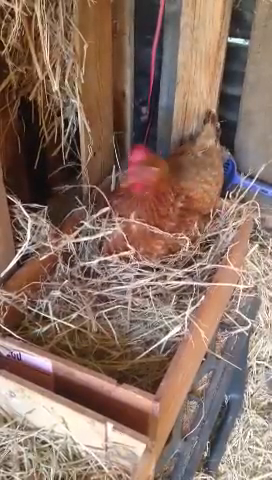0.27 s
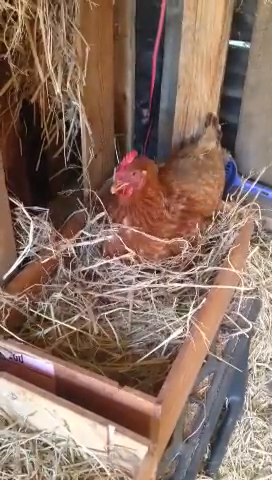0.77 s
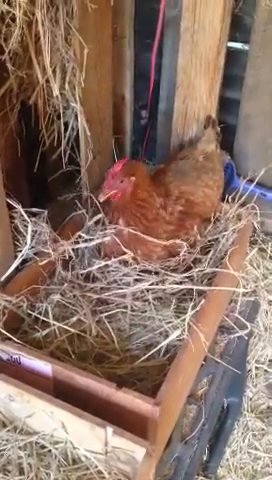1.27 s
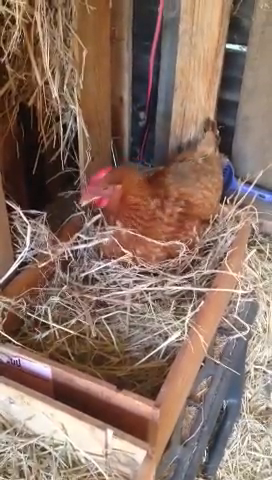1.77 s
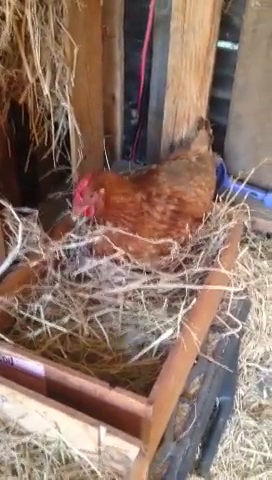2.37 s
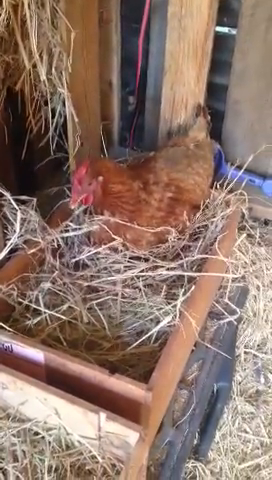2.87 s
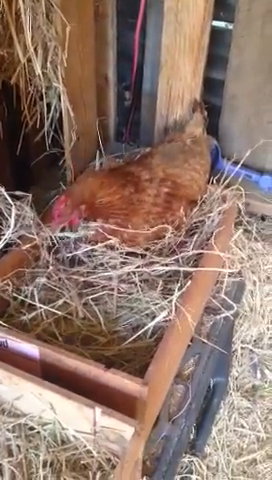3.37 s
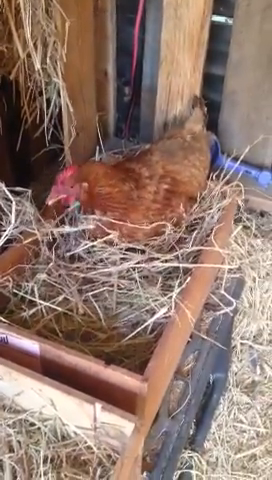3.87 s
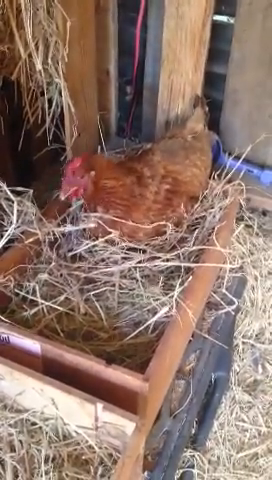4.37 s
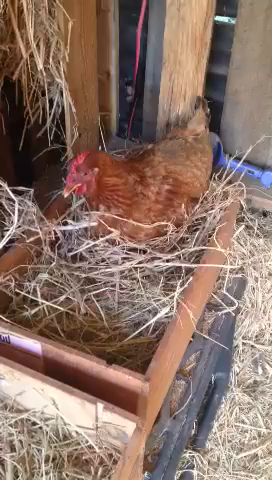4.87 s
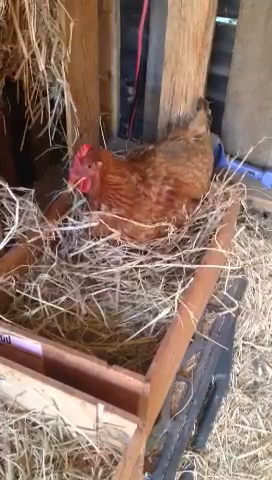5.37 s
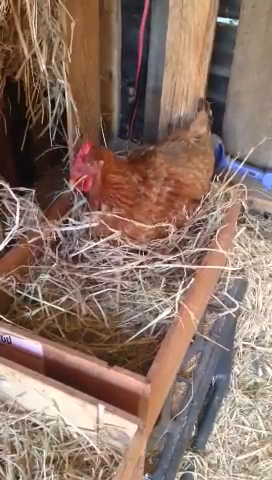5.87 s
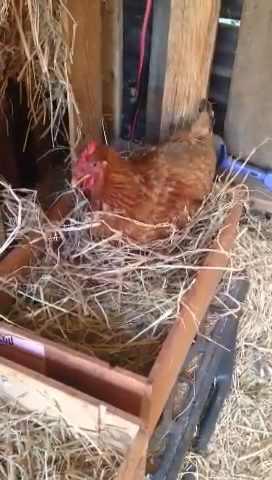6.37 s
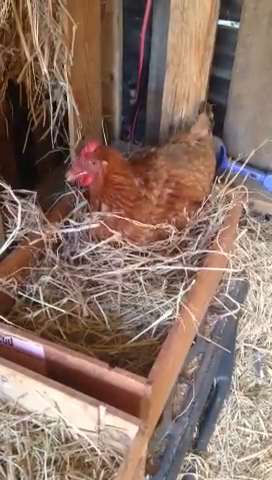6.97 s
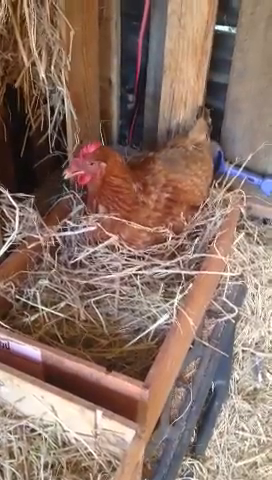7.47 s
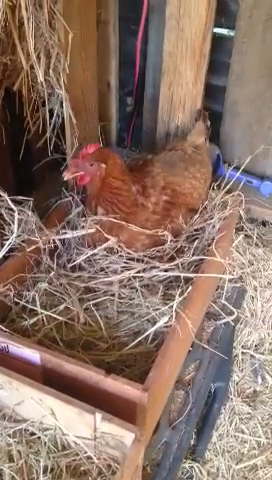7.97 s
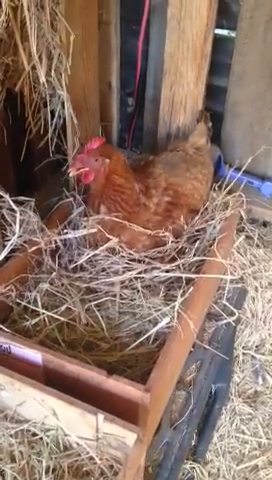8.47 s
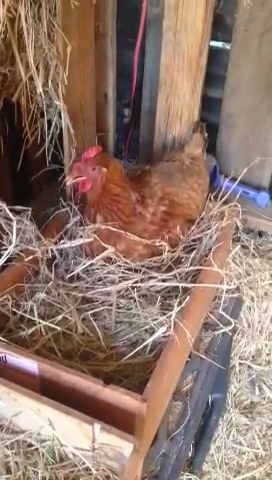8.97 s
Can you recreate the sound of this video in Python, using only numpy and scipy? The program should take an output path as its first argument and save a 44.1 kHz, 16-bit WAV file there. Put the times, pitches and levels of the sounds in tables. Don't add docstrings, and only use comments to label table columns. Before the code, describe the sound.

A hen in a straw-lined wooden nest box, an arm's length from a phone microphone. A quiet hoarse rasp comes first, then a wavering moan that rises and swells, then short rounded clucks. They settle into an even run of four or five per second, growing louder, and turn into harsh, bright squawks to the end. The boards add a brief dull tail; faint hiss, distant droning hens and rare straw ticks lie behind.

```python
import sys
import numpy as np
from scipy import signal
from scipy.fft import rfft, irfft
from scipy.io import wavfile
from scipy.ndimage import uniform_filter1d, minimum_filter1d

SR = 44100
rng = np.random.default_rng(int(sys.argv[2]) if len(sys.argv) > 2 else 0)


def generate_wav(signal):
    frames = np.transpose(np.atleast_2d(signal))
    scaled = np.clip(frames, -1, 1) * 32767
    pcm = np.round(scaled).astype(np.int16)
    wavfile.write(sys.argv[1], SR, pcm)


def volts_from_db(level):
    exponent = np.asarray(level, float) / 20
    return 10 ** exponent


N = 405719

# hz, width_hz, level_db
SOFT_PIPE_MODES = [(240, 140, -22), (800, 50, -18.5), (975, 320, -2.5), (1127, 150, -6.5)]
# hz, width_hz, level_db
GAPE_MODES = [(3395, 460, -5.5), (4244, 450, -10.5), (5215, 500, -13.5), (6600, 720, -18),
              (7600, 940, -21.5), (10450, 2700, -29.5), (12000, 2700, -30.5), (14300, 2000, -31)]
# start_s, length_s, level_db, effort_db, cycle_hz
SECOND_PUSHES = [
    (6.626, .035, -26.5, -6.5, 260.7),
    (7.731, .045, -29, -4.5, 351.2),
    (7.984, .052, -26.5, -5, 347.8),
    (8.322, .045, -24, -10.5, 227.9),
    (8.62, .034, -28, -22.5, 240),
    (8.652, .044, -21, -11, 244.3),
    (8.973, 0.12, -22, -12, 240),
]
OPEN_S, RELEASE_S, GLIDE_SHARE = 0.008, 0.015, 0.93


def walk(rate_hz):
    hold = int(SR / rate_hz)
    steps = np.repeat(rng.standard_normal(N // hold + 1), hold)[:N]
    x = uniform_filter1d(steps, hold)
    return x / x.std()


def ring(x, modes, top_hz=15400.0):
    out = 0
    for hz, width_hz, level_db in modes:
        peak = np.concatenate(signal.iirpeak(hz, hz / width_hz, SR))
        out = out + volts_from_db(level_db) * signal.sosfilt(np.tile(peak, (2, 1)), x)
    return signal.sosfilt(signal.butter(6, top_hz, fs=SR, output="sos"), out)


def even(x, span_s=0.068):
    return x / np.sqrt(uniform_filter1d(x ** 2, int(span_s * SR)) + 1e-12)


def play(calls, rise_s=0.003, fall_s=0.005):
    t = np.arange(N) / SR
    s, *columns = np.transpose(np.concatenate(calls))
    gate = np.zeros(N)
    for call in calls:
        start_s, end_s = call[0][0], call[-1][0]
        gate += np.interp(t, [start_s - rise_s, start_s, end_s, end_s + fall_s], [0, 1, 1, 0])
    level_db, *others = [uniform_filter1d(np.interp(t, s, c), size=200) for c in columns]
    return np.clip(gate, 0, 1) ** 2 * volts_from_db(level_db), *others


def slaps(hz, second, rough, jitter=0.1, shimmer_db=6.0):
    phase = np.cumsum(2 * hz * (1 + jitter * rough * walk(350))) / SR
    count = np.arange(1, int(phase[-1]))
    at = np.interp(count, phase, np.arange(N))
    i = np.clip(at.astype(int), 8, N - 9)
    shimmer = volts_from_db(shimmer_db * rough[i] * rng.uniform(-1.7, 1.7, N)[count])
    size = np.where(count % 2, second[i], 1) * shimmer
    taps = np.arange(-7, 9)
    off = i[:, None] + taps - at[:, None]
    kernel = np.sinc(off) * np.cos(np.pi * off / 16) ** 2
    pulses = np.zeros(N)
    np.add.at(pulses, i[:, None] + taps, size[:, None] * kernel)
    puff = np.exp(-(phase / 2 % 1) / 0.77)
    return even(pulses), even(puff * rng.standard_normal(N)), phase


def clicks(events, decay_s):
    out = np.zeros(N)
    t = np.arange(int(6 * decay_s * SR)) / SR
    for (s, peak_db), noise in zip(events, rng.standard_normal((len(events), 4000))):
        out[int(s * SR):][:len(t)] += volts_from_db(peak_db) * noise[:len(t)] * np.exp(-t / decay_s)
    return out


def air():
    # hz, level_db (per Hz)
    spectrum = [(30, -30.5), (178, -2), (325, -1.5), (444, -10), (1330, -10.5), (1480, -16.5), (3600, -19),
                (15600, -21.5)]
    level_db, split_hz = -63.5, 700
    hz = np.fft.rfftfreq(N, 1 / SR) + 1
    point_hz, point_db = np.transpose(spectrum)
    colour = volts_from_db(np.interp(np.log(hz), np.log(point_hz), point_db))
    low = 1 / (1 + (hz / split_hz) ** 4)
    murmur = irfft(rfft(rng.standard_normal(N)) * colour * np.sqrt(low), N)
    hiss = irfft(rfft(rng.standard_normal(N)) * colour * np.sqrt(1 - low), N)
    x = murmur * volts_from_db(2 * walk(3) + 2 * walk(15)) + hiss
    return volts_from_db(level_db) * x / x.std()


def flock():
    # hz, width_hz, level_db
    modes = [(333, 96, -1.5), (487, 27, -3)]
    level_db = -74
    drone = even(ring(rng.standard_normal(N), modes), span_s=0.38)
    return volts_from_db(level_db + 3.5 * walk(3.0)) * drone


def box(x):
    # hz, width_hz, level_db
    hollow_modes = [(1000, 160, 1.2)]
    boards_t60_s, hollow_t60_s, delay_s = 0.088, 0.2, 0.0055
    level_db, top_hz = -17, 2200
    t = np.arange(SR // 3) / SR
    late = t > delay_s
    tail = rng.standard_normal(len(t)) * volts_from_db(-60 * t / boards_t60_s) * late
    tail = signal.lfilter(*signal.butter(1, top_hz, fs=SR), tail)
    tail = tail / tail[:SR // 20].std()
    hollow = ring(rng.standard_normal(len(t)), hollow_modes)
    tail = tail + hollow * volts_from_db(-60 * t / hollow_t60_s) * late
    return volts_from_db(level_db) * signal.fftconvolve(x, tail / np.sqrt(np.sum(tail ** 2)))[:N]


def straw():
    # start_s, peak_db
    ticks = [
        (1.252, -64),
        (2.198, -58),
        (8.439, -53),
    ]
    return signal.lfilter(*signal.butter(2, [1800, 9000], "band", fs=SR), clicks(ticks, 0.015))


def throat_pops():
    # start_s, peak_db
    pops = [(1.338, -47), (1.423, -37), (1.696, -48.5), (2.003, -41), (2.249, -31), (2.485, -28.5),
            (2.7, -34), (2.943, -19.5), (3.175, -32), (3.382, -31.5), (3.599, -21.5), (3.823, -18.5),
            (4.032, -19.5), (4.937, -30.5)]
    return 4.8 * ring(clicks(pops, 0.0036), SOFT_PIPE_MODES, top_hz=1150.0)


def rasp():
    # s, level_db
    rasps = [
        [(0.0, -55), (0.26, -47), (0.408, -46.5), (0.44, -75)],
        [(0.606, -50.5), (0.64, -46.5), (0.69, -63)],
    ]
    # hz, width_hz, level_db
    slack_modes = [(860, 260, 4.5), (1252, 82, 8), (1527, 220, -4.5), (2410, 260, -14.5), (3830, 640, -17)]
    _, breath, _ = slaps(np.full(N, 190.0), np.full(N, 0.8), np.full(N, 0.9), jitter=0.31)
    return play(rasps)[0] * even(ring(breath, slack_modes))


def cluck(s, length_s, first_db, last_db, hz):
    attack_s, release_s, sag_at = 0.011, 0.026, 0.57
    start_db, sag_db, end_db = -9, -2, -10
    effort_db, end_effort_db = -32.5, -29.5
    sharp_hz = 1.04 * hz
    end_s = s + length_s
    return [(s, first_db + start_db, effort_db, sharp_hz),
            (s + attack_s, first_db, effort_db, hz),
            (s + sag_at * length_s, min(first_db, last_db) + sag_db, effort_db, hz),
            (end_s - release_s, last_db, end_effort_db, hz),
            (end_s, last_db + end_db, end_effort_db, sharp_hz)]


def clucks():
    # s, level_db, effort_db, second_partial_hz
    moan = [
        [(0.51, -49, -20, 1080), (0.585, -49, -20, 1070)],
        [(0.665, -49.5, -20, 1076), (0.725, -46, -21, 1040), (0.84, -45.5, -29, 1095), (0.97, -39.5, -28, 977),
         (1.082, -39.5, -24, 1061), (1.144, -32.5, -31.5, 960), (1.246, -28.5, -31, 972),
         (1.268, -36, -21.5, 1080), (1.29, -39, -30, 1064)],
    ]
    # start_s, length_s, first_swell_db, last_swell_db, second_partial_hz
    cluck_rows = [(1.446, 0.059, -27.5, -30, 983), (1.507, 0.053, -35.5, -32, 932),
                  (1.555, .09, -31.5, -34.5, 1001), (1.763, 0.13, -31, -33, 1000),
                  (2.026, .108, -30.5, -22.5, 918.4), (2.27, 0.091, -23.5, -21.5, 928.7),
                  (2.506, 0.076, -21.5, -24, 882), (2.72, 0.091, -22, -23.5, 877.5),
                  (2.962, .098, -25, -20, 927.7), (3.199, 0.068, -16.5, -18.5, 928),
                  (3.405, 0.086, -16, -21, 914), (3.612, 0.079, -20.5, -14.5, 910)]
    # from_s, to_s, unevenness (0-1), roughness (0-1), flutter_db
    breaks = [(.7, .86, 0, .1, 5), (.86, 1.136, 0, .13, 4.5), (1.258, 1.297, .1, .35, 1),
              (1.449, 1.506, .33, .19, 1.5), (1.563, 1.65, .48, .22, 1.5), (1.77, 1.902, .08, .08, 3),
              (2.031, 2.07, .08, .12, 3), (2.27, 2.312, .3, .15, 1), (2.501, 2.59, .45, .1, .4),
              (2.716, 2.835, .35, .17, .4), (2.937, 3.011, .5, .5, 2), (3.2, 3.499, .13, .2, 1),
              (3.619, 3.66, .28, .36, 2)]
    # hz, width_hz, level_db
    soft_beak_modes = [(1850, 320, -1.4), (2545, 380, 0.26), (2806, 560, -1.2)]
    # hz, width_hz, level_db
    nose_modes = [(1560, 280, -2.5), (3100, 300, -7), (4620, 290, -5.5)]
    uneven_effort_db, rough_effort_db = 10.5, 15
    pocket_hz, pocket_width_hz, pocket_share = 1334, 300, 0.78
    root_db, root_open_db = -47, 3.5

    gain, effort_db, second_hz = play(moan + [cluck(*row) for row in cluck_rows])
    uneven, rough, flutter_db = np.zeros(N), np.full(N, 0.03), np.full(N, 0.6)
    for from_s, to_s, *state in breaks:
        for control, value in zip((uneven, rough, flutter_db), state):
            control[int(from_s * SR):int(to_s * SR)] = value
    extra_db = uneven_effort_db * uneven + rough_effort_db * rough
    effort_db = effort_db + uniform_filter1d(extra_db, size=400)

    hz = second_hz / 4 * (1 + 0.012 * walk(45) + 0.017 * walk(160))
    pulses, breath, phase = slaps(hz, 1 - np.clip(uneven, 0, 1), rough, jitter=0.1)
    source = pulses + 1.8 * rough ** 2 * breath

    shut = np.clip((second_hz - 930) / 50, 0, 1)
    beak = ring(source, soft_beak_modes, top_hz=2880.0) * volts_from_db(1.7 * walk(40))
    beak = beak + shut * ring(source, nose_modes) * volts_from_db(2.5 * walk(27))
    beak = beak + volts_from_db(-8.5) * (1 - shut) * ring(pulses + 0.5 * breath, GAPE_MODES)
    pipe = even(ring(source, SOFT_PIPE_MODES, top_hz=1200.0))
    upper = pipe + volts_from_db(effort_db) * even(beak, span_s=0.15)

    pocket = signal.lfilter(*signal.iirpeak(pocket_hz, pocket_hz / pocket_width_hz, SR), upper)
    upper = upper - np.clip(pocket_share * (1 - shut), 0, 1) * pocket
    upper = upper * volts_from_db(uniform_filter1d(flutter_db, 400) * np.clip(walk(55), -2, 1))

    root = np.minimum(gain, volts_from_db(root_db + root_open_db * (1 - shut) + 1.2 * walk(30.23)))
    fundamental = root * np.sqrt(2) * np.sin(2 * np.pi * phase)
    return np.sqrt(gain ** 2 - 0.99 * root ** 2) * upper + fundamental


def ending_db(s):
    joined_db, end_db = -3.5, -13
    gap_s = np.min(np.abs(np.array(SECOND_PUSHES)[:, 0] - s))
    return joined_db if gap_s < 0.012 else end_db


def push_roughness(hz):
    return 0.62 - 0.003 * (hz - 300)


def squawk(s, length_s, level_db, push_s, hz):
    # s, effort_db
    arousal = [(3.8, -12), (4.3, -13), (5.0, -10), (5.7, -7.5), (7.3, -5.5), (7.8, -5.5), (8.9, -6)]
    peak_s, full_s, ease_s = 0.026, 0.042, 0.014
    start_db, open_db, peak_db, push_db, eased_db = -12, -4.5, 4.5, -2.5, 0.5
    start_hz, slack_hz, rest_hz = 211.1, 224.2, 243.2
    rough_start, rough_peak, rough_rest = 0.72, 0.76, 0.7

    full_effort_db = np.interp(s, *np.transpose(arousal))
    start_effort_db, peak_effort_db = full_effort_db - 7, full_effort_db - 1.5
    rest_effort_db = -15 + 0.36 * full_effort_db
    eased_s = min(push_s + ease_s, length_s)
    rough = push_roughness(hz)
    points = [(0, start_db, start_effort_db, start_hz, rough_start),
              (OPEN_S, open_db, start_effort_db, start_hz, rough_start),
              (min(peak_s, 0.6 * push_s), peak_db, peak_effort_db, (start_hz + hz) / 2, rough_peak),
              (min(full_s, 0.9 * push_s), push_db, full_effort_db, GLIDE_SHARE * hz, rough),
              (push_s, push_db, full_effort_db, hz, rough),
              (eased_s, eased_db, rest_effort_db, slack_hz, rough_rest),
              (max(eased_s, length_s - RELEASE_S), 0, rest_effort_db, rest_hz, rough_rest),
              (length_s, ending_db(s + length_s), rest_effort_db + 1.5, rest_hz, rough_rest)]
    return [(s + after_s, level_db + change_db, *rest) for after_s, change_db, *rest in points]


def second_push(s, length_s, level_db, effort_db, hz):
    # after_s, change_db, share of the full rate
    shape = [(0, 1, GLIDE_SHARE),
             (OPEN_S, 0, GLIDE_SHARE),
             (length_s - RELEASE_S, 0, 1),
             (length_s, ending_db(s + length_s), 1)]
    rough = push_roughness(hz)
    return [(s + after_s, level_db + change_db, effort_db, hz * share, rough)
            for after_s, change_db, share in shape]


def squawks():
    # start_s, length_s, level_db, push_s, full_push_cycle_hz
    squawk_rows = [(3.838, 0.082, -25, 0.031, 321.5), (4.044, 0.087, -24, 0.036, 311.5),
                   (4.269, 0.12, -24, 0.057, 261.5), (4.518, 0.11, -25, 0.062, 288.8),
                   (4.739, 0.094, -24.5, 0.063, 322), (4.947, 0.087, -25, 0.073, 262.9),
                   (5.172, 0.097, -25, 0.061, 315), (5.4, .1, -24, 0.07, 329),
                   (5.644, 0.15, -25, 0.11, 340.1), (5.901, .102, -25.5, 0.081, 279.4),
                   (6.128, 0.097, -25.5, 0.049, 334.2), (6.329, 0.11, -25.5, 0.046, 245.5),
                   (6.542, 0.088, -25, 0.056, 302), (6.756, 0.073, -25.5, 0.05, 289.7),
                   (6.964, .12, -23, .056, 253.4), (7.205, 0.13, -25, 0.059, 344.1),
                   (7.431, 0.084, -24, 0.061, 347.2), (7.644, 0.09, -24, .056, 337.6),
                   (7.896, 0.095, -24.5, 0.051, 295.8), (8.209, 0.11, -21, 0.078, 358.3),
                   (8.526, 0.095, -23, 0.058, 249.4), (8.881, .092, -23, 0.084, 355.6)]
    # hz, width_hz, level_db
    pipe_modes = [(240, 77, -15.5), (490, 314, -14), (731, 37, -3.5), (898, 296, 2)]
    # hz, width_hz, level_db
    mouth_modes = [(1158, 150, 1), (1276, 680, -20.5)]
    # hz, width_hz, level_db
    beak_modes = [(1818, 540, -8.5), (2051, 190, -2), (2407, 238, 4.5)]
    # hz, width_hz
    gaps = [(610, 88), (2980, 636), (3880, 100), (4850, 91), (5900, 290), (9100, 2400)]
    waver_db, wander = 1.3, 0.035

    calls = [squawk(*row) for row in squawk_rows] + [second_push(*row) for row in SECOND_PUSHES]
    gain, effort_db, hz, rough = play(sorted(calls))
    waver = walk(45)
    gain = gain * volts_from_db(waver_db * waver)
    hz = hz * (1 + wander * waver * rough)
    second = np.clip((-effort_db - 11) / 11, 0, 0.95) * np.clip((290 - hz) / 30, 0, 1)
    rough = np.clip(rough, 0, 1) ** 2 * (1 - 0.4 * second)
    pulses, breath, _ = slaps(hz, second, rough)
    low = pulses + 0.7 * rough * breath
    high = pulses + (0.3 + rough) * breath

    mouth = ring(low, mouth_modes, top_hz=1772.0)
    pipe = ring(low, pipe_modes, top_hz=1364.0) + volts_from_db(0.49 * (effort_db + 13.5)) * mouth
    beak = ring(high, beak_modes) + volts_from_db(0.5 * (effort_db + 8.5)) * ring(high, GAPE_MODES)
    voice = even(pipe) + volts_from_db(effort_db) * even(beak)
    for gap_hz, width_hz in gaps:
        voice = signal.lfilter(*signal.iirnotch(gap_hz, gap_hz / width_hz, SR), voice)
    return gain * voice


def scene():
    hen = clucks() + squawks() + rasp() + throat_pops()
    inside = hen + straw()
    return (inside + box(inside) + flock() + air())[None]


def top_cut(x):
    return signal.sosfilt(signal.butter(12, 15750, fs=SR, output="sos"), x)


def record(dry):
    limit, top_hz = 0.225, 15350
    x = signal.sosfilt(signal.butter(3, 110, "high", fs=SR, output="sos"), dry)
    peak = uniform_filter1d(-minimum_filter1d(-np.abs(x), size=130), size=130)
    x = x * np.minimum(1, limit / (peak + 1e-9)) ** 0.7
    x = signal.sosfilt(signal.butter(2, 70, "high", fs=SR, output="sos"), x)
    x = signal.sosfilt(signal.ellip(8, 0.2, 70, top_hz, fs=SR, output="sos"), x)
    return top_cut(x)


dry = scene()
out = record(dry)
generate_wav(out)
```